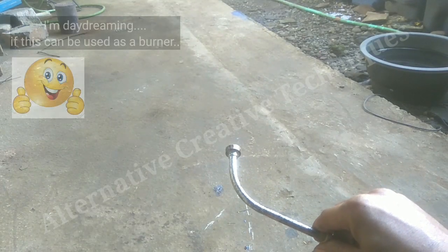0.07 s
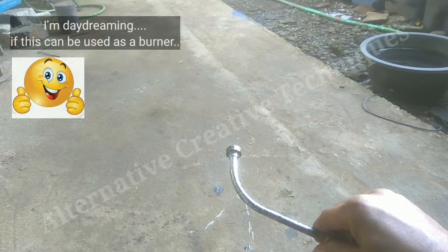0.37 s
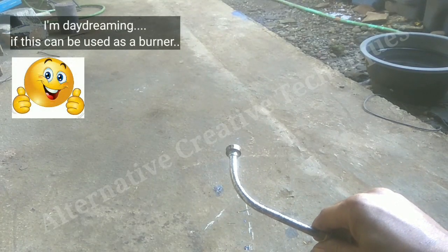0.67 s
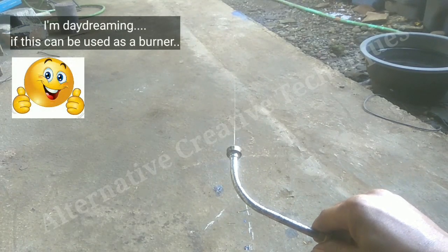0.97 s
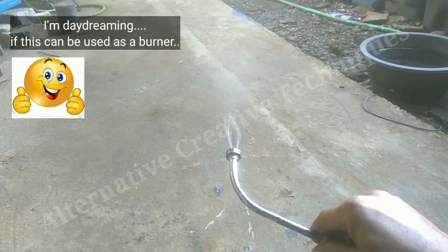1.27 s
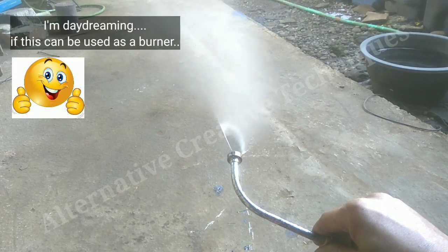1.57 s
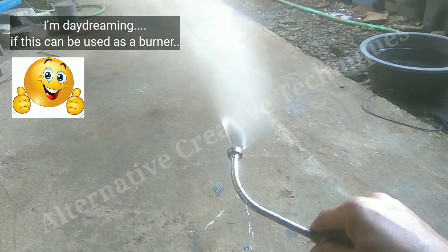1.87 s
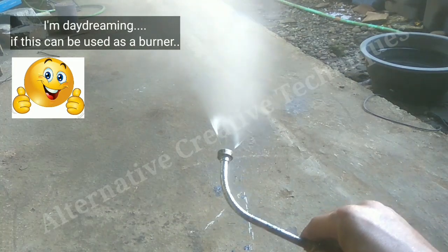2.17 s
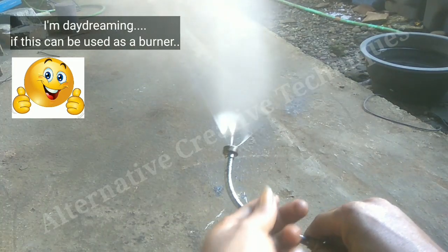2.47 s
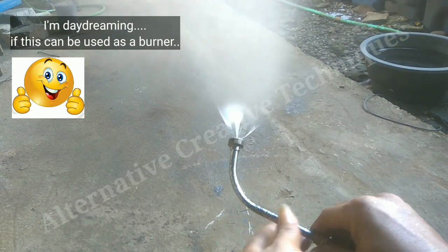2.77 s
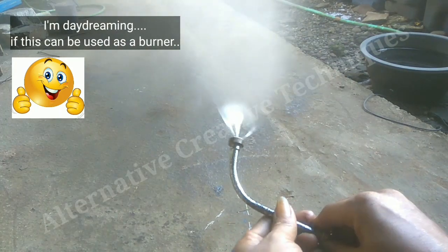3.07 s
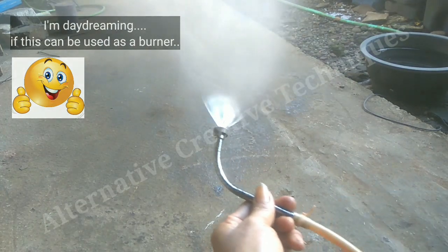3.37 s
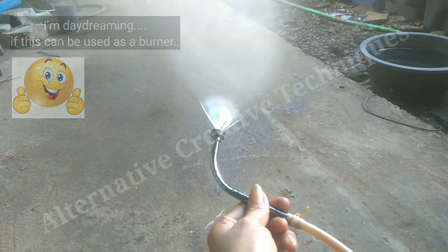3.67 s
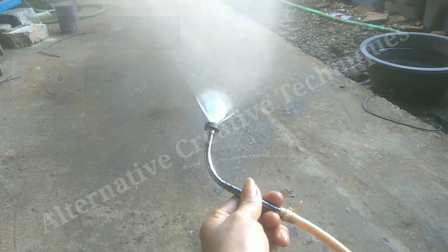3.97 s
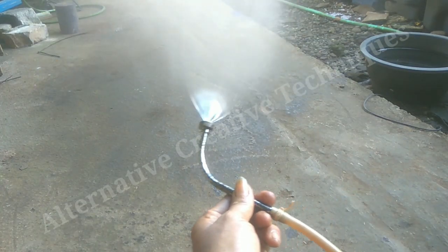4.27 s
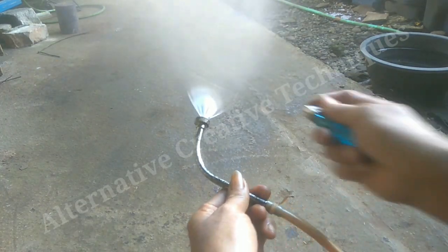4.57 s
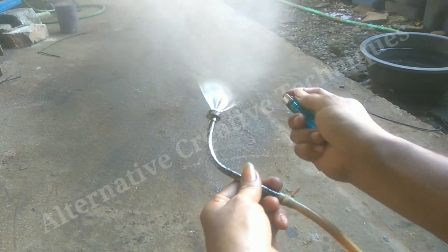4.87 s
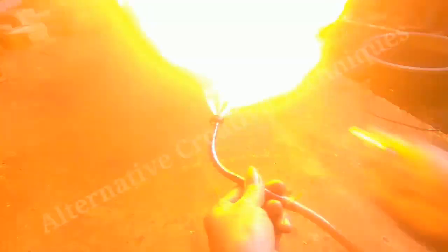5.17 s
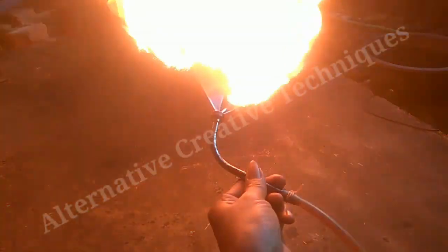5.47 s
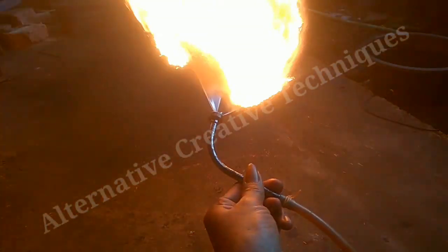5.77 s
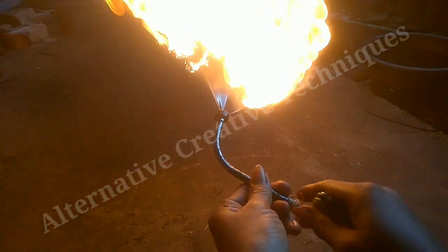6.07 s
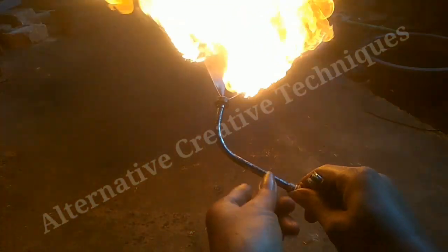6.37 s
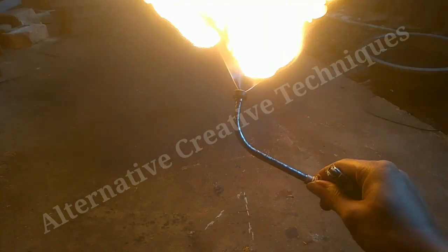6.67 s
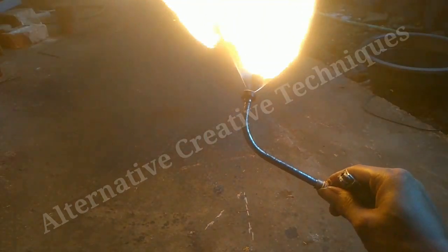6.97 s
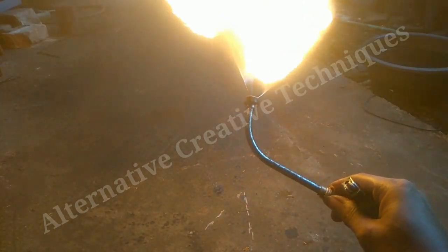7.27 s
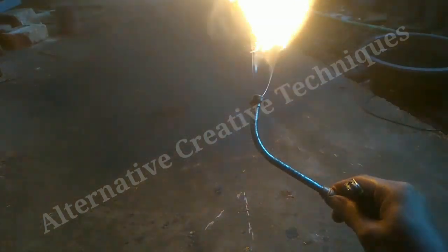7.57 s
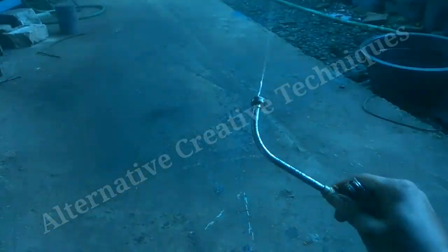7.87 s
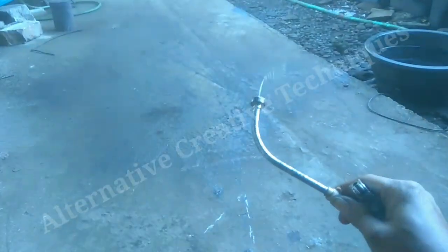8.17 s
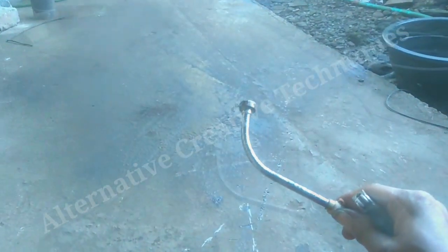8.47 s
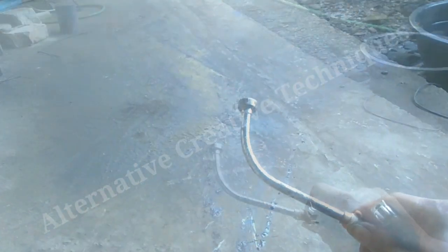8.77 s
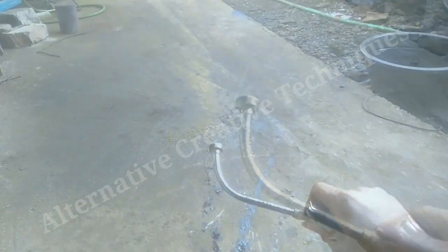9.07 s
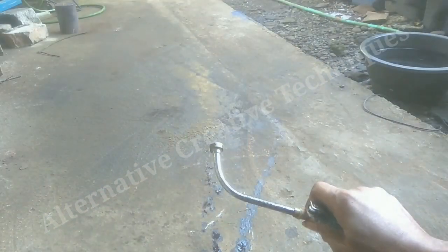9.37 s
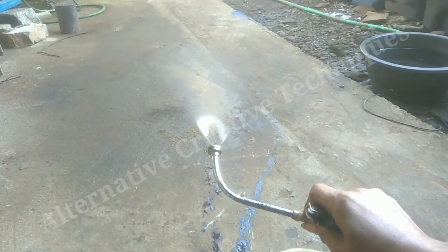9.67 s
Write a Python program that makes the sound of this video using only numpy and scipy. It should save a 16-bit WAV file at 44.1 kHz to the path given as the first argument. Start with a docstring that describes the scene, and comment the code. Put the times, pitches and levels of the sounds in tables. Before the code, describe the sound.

A hissing spray is lit with a lighter, whumps into a roaring flame and goes out, leaving shrill insects in the yard.

```python
"""Insects shrill around a concrete yard, over a faint far engine and open air.
A hand-held nozzle spits, pops clear and sprays a hissing fuel mist. A lighter sets it off:
pockets of mist thump, eddies shake the roar and sizzle, and the flame dies at fuel shut-off.
A far rooster and a small bird call faintly. At the end the spray starts again."""
import sys
import numpy as np
from scipy import signal
from scipy.fft import rfft, irfft, next_fast_len
from scipy.io import wavfile
from scipy.ndimage import uniform_filter1d

SR = 44100
rng = np.random.default_rng(int(sys.argv[2]) if len(sys.argv) > 2 else 0)


def bounce(signal):
    """Save signal as a 16-bit WAV file at the path given by the first command-line argument."""
    frames = np.transpose(np.atleast_2d(signal))
    limited = np.clip(frames, -1, 1)
    pcm = np.round(limited * 32767).astype(np.int16)
    wavfile.write(sys.argv[1], SR, pcm)


N = 437031
T = np.arange(N) / SR

# insect chorus level, fading out near the end: t/s, level/dB, pulse depth of the nearest singer/0-1
INSECT_LEVEL = [(0, -52.5, .3), (3.5, -52, .45), (4.2, -56.5, .6), (5, -51.5, .85), (5.6, -55, .5),
                (6.4, -54.5, .5), (7.85, -50, .4), (8.7, -61, .6), (9.2, -63, .5), (9.6, -88, .4)]
# far chorus: f/Hz, level/dB
CHORUS_SPECTRUM = [(2000, -80), (4250, -50), (4410, -26), (4520, -17), (4590, -6), (4665, -1), (4710, -7),
                   (4755, -18), (5100, -34), (5450, -23), (5570, -18), (5700, -31), (5900, -46),
                   (9000, -80)]
# singers joining in: start/s, end/s, fade/s, f/Hz, level/dB
TRILL_NOTES = [(-.5, 1.5, .5, 4592, -56), (1.4, 4.9, .6, 4590, -64), (8.58, 8.655, 0.012, 4625, -53.5)]
# insects buzzing higher up: start/s, end/s, fade/s, f/Hz, glide/(Hz/s), level/dB
BUZZ_NOTES = [(-.5, 2.4, .6, 6680, -50, -64), (3.5, 8.65, 0.62, 6735, 22, -62),
              (7.6, 8.94, .5, 5580, -0.5, -71), (9, 11, 0.86, 7110, 169, -60.5),
              (-2, 5.7, 1.8, 7525, -6, -61), (2.5, 12.4, 4, 7465, 5, -63.5)]
# tiny insects at the very top: f/Hz, level/dB
SHIMMER_SPECTRUM = [(6000, -50), (9200, -14), (10300, 3), (11200, -2), (12300, -20)]
# far engine speeding up and easing off: t/s, firing rate/Hz, level/dB
ENGINE_RUN = [(0, 32, -56), (.42, 31.7, -57), (.7, 30.5, -59.5), (1.15, 31.4, -57.5), (2, 35.23, -63),
              (3.1, 38.77, -61), (4, 42.4, -62), (4.7, 37.5, -67), (8.6, 35.2, -63.5), (9.5, 35.56, -79)]
# exhaust resonances: f/Hz, half width/Hz, weight/dB
EXHAUST_MODES = [(123, 10.5, 1), (160, 10.5, -0.5), (186.7, 11.4, 1.5), (225, 13, -3)]
# engine machinery: f/Hz, level/dB
WHIR_SPECTRUM = [(150, -26), (400, 7), (500, -23), (620, 7), (760, -55), (880, 10.5), (1050, -19),
                 (1250, 6.5), (1600, -43), (5000, -66)]
# open-air background: t/s, level/dB
AIR_LEVEL = [(0, -59), (7.5, -57.5), (8.3, -59), (9, -64), (9.35, -62), (9.9, -59.5)]
# open-air background: f/Hz, level/dB
AIR_SPECTRUM = [(20, -27), (45, 0), (80, 0.5), (140, -7.5), (250, -8), (340, -15.5), (420, -12.5),
                (640, -12), (850, -19.5), (1600, -25), (4700, -26.5), (5800, -16.5), (10400, -22),
                (12300, -37)]
# mid-range background rising near the end: f/Hz, level/dB
LATE_MID_SPECTRUM = [(150, -28), (330, -16), (420, 0), (660, 0), (850, -9), (1600, -22), (5000, -35)]
# nozzle spits: t/s, level/dB, decay/s, body f/Hz, body/dB, fizz/dB
NOZZLE_SPITS = [(1.076, -57, 0.021, 1060, -1, -14), (1.083, -43, 0.0025, 1070, -16, 0.5),
                (1.369, -51, 0.022, 1030, -7, -7), (1.396, -41, .002, 1100, -14, 1),
                (1.404, -44, .014, 980, -7, -2), (1.44, -54, 0.027, 1050, -9, -1),
                (2.612, -48, .008, 1700, 0, -2), (3.532, -47, 0.013, 1550, 0, -9),
                (3.776, -46, .012, 1555, 1, -9), (3.8, -47, .008, 1600, 0, -9),
                (3.889, -46, .005, 1500, 2, -6), (6.425, -39, .03, 1600, -2, -2),
                (7.598, -39.5, 0.026, 1400, -4, 0.5), (7.645, -44, 0.0083, 1402, -10, -3),
                (9.811, -56, 0.0052, 1199, -4, 0), (9.83, -55, .01, 1990, -7, 4),
                (9.842, -50, .006, 2000, -4, 0.5)]
# fizz of spits and sparks: f/Hz, level/dB
FIZZ_SPECTRUM = [(500, -25), (1800, -7), (3000, -3.5), (4200, -1.5), (6500, 6), (9000, 4), (10800, -2),
                 (12300, -34)]
# echoes off nearby things: delay/s, level/dB
REFLECTIONS = [(.0065, -24), (.0077, -25), (.0101, -20), (.0178, -17)]
# valve openings: t/s, build-up/s, level/dB
VALVE_OPENINGS = [(1.56, 0.1, -46), (9.815, 0.08, -46.5)]
# hiss of the mist: f/Hz, level/dB
MIST_SPECTRUM = [(40, -25), (150, -12), (300, -8), (540, -9), (680, 0), (880, -2), (1080, -3.5), (1400, -7),
                 (1720, -9.5), (2000, -6.5), (2500, -8.5), (4000, -11), (5100, -11), (6600, -5.5),
                 (10300, -12), (12300, -34.5)]
# shifting resonant peaks in the spray's hiss: t/s, low f/Hz, middle f/Hz, high f/Hz
HISS_PEAK_TRACKS = [(1.7, 900, 1200, 2870), (2.2, 879, 1230, 2890), (2.6, 860, 1330, 2880),
                    (3.3, 859.6, 1350, 2880), (3.7, 860, 1500, 2830), (4.7, 899.5, 1450, 2760),
                    (5.05, 1002, 1500, 2740)]
# hiss peaks, low to high: width/Hz, level re hiss/dB
HISS_PEAK_SHAPES = [(190, -9.5), (320, -12), (300, -15.5)]
# fuel pressure swells: t/s, half width/s, gain/dB
PRESSURE_SWELLS = [(3.28, 0.13, 1), (4.25, .2, 0.5)]
# lighter strikes: t/s, level/dB, decay/s, body f/Hz, body/dB, fizz/dB
LIGHTER_STRIKES = [(4.339, -43.5, .008, 1500, 3, -11), (4.759, -38.5, 0.0076, 1352, -3, -2.5),
                   (4.776, -42, .008, 1395, -7, -4), (5.114, -38.5, 0.0069, 6540, -5, -6),
                   (5.12, -34.5, 0.014, 6540, -5.5, -7)]
# rumble of the fireball: f/Hz, level/dB
RUMBLE_SPECTRUM = [(20, -23), (40, -16), (62, -10), (80, 5), (96, -5), (110, 3.5), (135, 0.5), (160, 0),
                   (195, -6), (240, -10), (300, -13.5), (360, -26.5), (600, -38), (2000, -80)]
# rumble heaving and sinking: t/s, half width/s, gain/dB
RUMBLE_HEAVES = [(5.27, .06, 1), (5.59, 0.049, -5.5), (6.17, .11, 2), (6.87, 0.11, 2.5), (7.01, 0.048, -4)]
# vigour of burning (surge, lull, second surge): t/s, gain/dB
BURN_VIGOUR = [(5.2, 1), (5.27, 0.3), (5.34, 5), (5.44, 5.5), (5.53, 2), (5.8, -0.8), (5.93, -1.8),
               (6.28, -1.8), (6.33, 1), (6.45, 2.5), (6.8, 0.2), (7.15, 0.5), (7.6, -1)]
# flame billows and lulls: t/s, half width/s, gain/dB
FLAME_BILLOWS = [(5.72, 0.027, 1.5), (6.53, .025, 0), (6.68, .03, 0.9), (7.0, 0.027, -1), (7.32, .025, 1.5),
                 (7.38, .02, -1), (7.475, .025, -1), (7.555, 0.04, 2.5)]
# brighter early roar: f/Hz, level/dB
EARLY_ROAR_SPECTRUM = [(150, 3), (225, 7), (300, 1.5), (350, -7), (395, 2.5), (440, -5.5), (487, 0.5),
                       (532, -7), (620, 0), (950, 2.5), (1080, -2), (1175, -9), (1530, -5.5), (1900, -12.5),
                       (3000, -20.5), (8000, -38)]
# darker later roar: f/Hz, level/dB
LATE_ROAR_SPECTRUM = [(150, -8), (265, -4), (320, -0.5), (355, -4.5), (397, 3.5), (435, -5.5), (560, 1),
                      (670, 3), (860, -1), (1020, -9), (1180, -7), (1430, -6.5), (1900, -14), (3000, -21),
                      (8000, -54)]
# sizzle of the flame: f/Hz, level/dB
SIZZLE_SPECTRUM = [(700, -27), (1700, -4), (2700, 1), (3800, -3.5), (5000, -1.5), (6300, 2.5), (7600, -2),
                   (9000, -5), (10300, -6), (12300, -28.5)]
# large mist pockets flaring: t/s, peak/dB
POCKET_FLARES = [(5.253, -14), (5.312, -17), (5.672, -18.5), (5.917, -9.5), (6.684, -11.5), (6.732, -16),
                 (6.806, -15)]
# rooster syllables: start/s, end/s, f/Hz, glide/(Hz/s), levels of harmonics 2, 3, 4/dB
CROW_SYLLABLES = [(8.21, 8.35, 648, 400, -82, -74, -78), (8.33, 8.45, 706, -60, -72, -81, -83),
                  (8.768, 8.98, 677, -70, -81, -79.5, -77)]
# small bird's chips: t/s, level/dB
BIRD_CHIPS = [(8.305, -65), (8.382, -55), (8.441, -63)]

IGNITE_S, SHUTOFF_S = 5.155, 7.618


def undb(db):
    """Decibels to gain."""
    return 10 ** (np.asarray(db) / 20)


def unit(x):
    """Scale to rms 1."""
    return x / np.sqrt(np.mean(x ** 2))


def curves(rows):
    """Each column of a timed table, per sample."""
    times_s, *columns = np.transpose(rows)
    return [np.interp(T, times_s, column) for column in columns]


def colour(x, spectrum):
    """Filter by a (f/Hz, level/dB) spectrum; rms 1."""
    size = next_fast_len(N)
    hz, db = np.transpose(spectrum)
    bins_hz = np.maximum(np.fft.rfftfreq(size, 1 / SR), 1)
    gain = undb(np.interp(np.log(bins_hz), np.log(hz), db))
    return unit(irfft(rfft(x, size) * gain, size)[:N])


def noise():
    """White noise."""
    return rng.standard_normal(N)


def walk(rate_hz):
    """Smooth random drift; rms 1."""
    drift = np.interp(T * rate_hz, np.arange(N), noise())
    return unit(uniform_filter1d(drift, max(1, int(SR / rate_hz / 2))))


def grains(rate_hz, spread_db):
    """Random impulses of uneven size; rms 1."""
    impulses = (rng.random(N) < rate_hz / SR) * np.sign(noise())
    return unit(impulses * undb(spread_db * np.clip(noise(), -2, 2)))


def phase_of(hz):
    """Phase/rad of a moving frequency."""
    return 2 * np.pi * np.cumsum(hz) / SR


def since(t_s):
    """Seconds since t_s; zero before."""
    return np.maximum(T - t_s, 0)


def build_up(start_s, rise_s):
    """Gain rising from 0, settling at 1."""
    return 1 - np.exp(-since(start_s) / rise_s)


def hold(start_s, end_s, fade_s):
    """Gain: fade in, hold, fade out."""
    return np.clip(np.minimum(T - start_s, end_s - T) / fade_s, 0, 1)


def swell(centre_s, half_width_s):
    """Bell-shaped gain."""
    return np.exp(-((T - centre_s) / half_width_s) ** 2)


def swells_db(rows):
    """Sum of brief rises and dips."""
    return sum(db * swell(t_s, half_width_s) for t_s, half_width_s, db in rows)


def singer(hz, waver_hz=8):
    """One insect's nearly pure, unsteady note."""
    return unit(np.sin(phase_of(hz + waver_hz * walk(24)))) * undb(0.4 * walk(25))


def buzzer(hz, stroke_hz=38, join_s=0.0087):
    """Each wing stroke restarts a high note at random phase; the joins stutter."""
    stroke = np.floor(stroke_hz * T + .4 * walk(20)).astype(int)
    offset = 2 * np.pi * rng.random(N)[stroke]
    along, across = uniform_filter1d([np.cos(offset), np.sin(offset)], int(join_s * SR))
    phase = phase_of(hz + 10 * walk(120))
    note = along * np.sin(phase) + across * np.cos(phase)
    return unit(note * undb(1.7 * walk(110)))


def insects(stroke_hz=36.3, chorus_db=-2, nearest_db=-1):
    """A far chorus blurs into a narrow band; near singers beat against it, others buzz above."""
    level_db, depth = curves(INSECT_LEVEL)
    wing_pulse = unit(1 + depth * np.sin(phase_of(stroke_hz + 0.59 * walk(12))))
    chorus = undb(chorus_db) * colour(noise(), CHORUS_SPECTRUM)
    nearest = undb(nearest_db) * wing_pulse * singer(hz=4676)
    out = (chorus + nearest) * undb(level_db)
    for start_s, end_s, fade_s, hz, db in TRILL_NOTES:
        out += singer(hz) * hold(start_s, end_s, fade_s) * undb(db)
    for start_s, end_s, fade_s, hz, glide_hz_per_s, db in BUZZ_NOTES:
        out += buzzer(hz + glide_hz_per_s * since(start_s)) * hold(start_s, end_s, fade_s) * undb(db)
    return out


def shimmer(re_air_db=-13, flutter_db=2.6):
    """Tiny insects: fluttering noise in the top treble."""
    air_db, = curves(AIR_LEVEL)
    return colour(noise(), SHIMMER_SPECTRUM) * undb(air_db + re_air_db + flutter_db * walk(200))


def engine(jitter=.002, scatter_db=1, whir_db=-14.5, drone_db=-59.5):
    """Firing harmonics swell as they pass exhaust resonances, over a machinery whir."""
    firing_hz, level_db = curves(ENGINE_RUN)
    phase = phase_of(firing_hz * (1 + jitter * walk(15)))
    exhaust, power = np.zeros((2, N))
    for k in range(2, 9):
        weight = sum(undb(db) * np.exp(-((k * firing_hz - hz) / half_width_hz) ** 2)
                     for hz, half_width_hz, db in EXHAUST_MODES)
        exhaust += weight * np.cos(k * phase)
        power += weight ** 2 / 2
    whir = undb(whir_db) * colour(noise(), WHIR_SPECTRUM)
    boom = exhaust / np.sqrt(power) * undb(scatter_db * walk(25))
    drone = unit(np.cos(2 * phase)) * swell(centre_s=2.24, half_width_s=0.215) * undb(drone_db)
    return (boom + whir) * undb(level_db) + drone


def open_air(late_mid_db=-68):
    """Gently swelling background; near the end it grows fuller in the mids."""
    air_db, = curves(AIR_LEVEL)
    late_mid = colour(noise(), LATE_MID_SPECTRUM) * build_up(start_s=9.05, rise_s=.15) * undb(late_mid_db)
    return colour(noise(), AIR_SPECTRUM) * undb(air_db + .5 * walk(2.4)) + late_mid


def puffs(rows, rise_s, q):
    """Nozzle spits or lighter sparks: bright fizz over a resonance and its weaker octave."""
    out = np.zeros(N)
    white = noise()
    fizz = colour(white, FIZZ_SPECTRUM)
    for t_s, db, decay_s, body_hz, body_db, fizz_db in rows:
        span = slice(int(t_s * SR), int(t_s * SR) + SR // 2)
        age_s = T[span] - T[span][0]
        low, octave = (signal.lfilter(*signal.iirpeak(hz, q, fs=SR), white[span])
                       for hz in (body_hz, 2 * body_hz))
        puff = undb(body_db) * unit(low + .25 * octave) + undb(fizz_db) * fizz[span]
        envelope = (1 - np.exp(-age_s / rise_s)) * np.exp(-age_s / decay_s)
        out[span] += undb(db) * envelope / envelope.max() * puff
    return out


def echoes(x):
    """Early reflections ripple the spectrum."""
    reflected = sum(undb(db) * np.interp(T - delay_s, T, x, left=0) for delay_s, db in REFLECTIONS)
    return (x + reflected) / np.sqrt(1 + sum(undb(db) ** 2 for _, db in REFLECTIONS))


def hiss_peak(hz, width_hz):
    """Noise band around a moving centre; rms 1."""
    skirt = [(k * width_hz, db) for k, db in [(.25, 0), (.5, -3), (1, -14), (4, -60), (8, -100)]]
    phase = phase_of(hz)
    return colour(noise(), skirt) * np.cos(phase) + colour(noise(), skirt) * np.sin(phase)


def spray(sag_db_per_s=.05, release_db_per_s=58):
    """The jet hisses and tears into droplets; resonant peaks shift in the hiss."""
    flow = np.zeros(N)
    for t_s, rise_s, db in VALVE_OPENINGS:
        closing_db = release_db_per_s * since(SHUTOFF_S) * (t_s < SHUTOFF_S)
        flow += build_up(t_s, rise_s) * undb(db - sag_db_per_s * since(t_s) - closing_db)
    jet = colour(noise() + 0.5 * grains(rate_hz=1100, spread_db=3), MIST_SPECTRUM)
    for hz, (width_hz, db) in zip(curves(HISS_PEAK_TRACKS), HISS_PEAK_SHAPES):
        jet += undb(db) * hiss_peak(hz, width_hz)
    return jet * flow * undb(swells_db(PRESSURE_SWELLS) + .5 * walk(9) + 0.85 * walk(90))


def nozzle_pop(t_s=1.568, hz=1040, decay_s=0.0073, db=-45):
    """The nozzle clears with a round, damped ring."""
    age_s = since(t_s)
    return undb(db) * np.exp(-age_s / decay_s) * np.sin(2 * np.pi * hz * age_s)


def burning(catch_s, release_db_per_s):
    """Gain: catches at ignition, holds while fuel flows, dies after shut-off."""
    return build_up(IGNITE_S, catch_s) * undb(-release_db_per_s * since(SHUTOFF_S))


def fireball(base_db=-24, whump_db=4, whump_s=0.14, starve_db=-3.5, starve_s=0.49):
    """Mist pockets ignite and expand; their low thumps merge into a rumble."""
    whump = np.exp(-since(IGNITE_S) / whump_s)  # mist already in the air burns off first
    starve = np.minimum(since(SHUTOFF_S - starve_s) / starve_s, 1)  # shrinks just before shut-off
    level_db = base_db + whump_db * whump + starve_db * starve
    heave_db = swells_db(RUMBLE_HEAVES) + 0.66 * walk(22)
    rumble = colour(grains(rate_hz=2600, spread_db=3), RUMBLE_SPECTRUM)
    return rumble * burning(catch_s=.035, release_db_per_s=70) * undb(level_db + heave_db)


def flame(roar_db=-33.5, sizzle_db=-40.5, darken_start_s=5.75, darken_s=0.72):
    """Eddies shake roar and sizzle together; a brighter early roar crossfades into a darker one."""
    vigour_db = curves(BURN_VIGOUR)[0] + swells_db(FLAME_BILLOWS)
    eddies = walk(70)
    late_share = np.minimum(since(darken_start_s) / darken_s, 1)
    early, late = (colour(noise() + 0.5 * grains(rate_hz=900, spread_db=7.5), spectrum)
                   for spectrum in (EARLY_ROAR_SPECTRUM, LATE_ROAR_SPECTRUM))
    roar = np.sqrt(1 - late_share) * early + np.sqrt(late_share) * late
    sizzle = colour(noise() + 0.47 * grains(rate_hz=900, spread_db=4), SIZZLE_SPECTRUM)
    roar *= undb(roar_db + vigour_db + 0.93 * eddies + .5 * walk(14))
    sizzle *= undb(sizzle_db + 0.49 * vigour_db + .5 * eddies + .5 * walk(110))
    return (roar + sizzle) * burning(catch_s=0.016, release_db_per_s=64)


def flares(hz=115, half_width_s=0.0047):
    """The largest mist pockets flare as single thumps."""
    return sum(undb(peak_db) * swell(t_s, half_width_s) * np.cos(2 * np.pi * hz * (T - t_s))
               for t_s, peak_db in POCKET_FLARES)


def far_off(x, t60_s, wet):
    """Walls and trees scatter a distant call into a short blur."""
    age_s = T[:SR // 2]
    tail = rng.standard_normal(len(age_s)) * undb(-60 * age_s / t60_s)
    scattered = signal.fftconvolve(x, tail / np.linalg.norm(tail))[:N]
    return (x + wet * scattered) / np.hypot(1, wet)


def rooster(jitter=0.016, rasp_db=4.5):
    """Hoarse far crow: three gliding harmonics, rough in pitch and level."""
    crow = np.zeros(N)
    for start_s, end_s, hz, glide_hz_per_s, *levels_db in CROW_SYLLABLES:
        pitch_hz = hz + glide_hz_per_s * np.clip(T - start_s, 0, end_s - start_s)
        phase = phase_of(pitch_hz * (1 + jitter * walk(270)))
        call = sum(undb(db + rasp_db * walk(40)) * np.sin(k * phase) for k, db in enumerate(levels_db, 2))
        crow += np.sqrt(2) * call * hold(start_s, end_s, fade_s=.04)
    return far_off(crow, t60_s=0.35, wet=0.84)


def small_bird(centre_hz=3100, sweep_hz=350, half_width_s=0.003):
    """Three quick chips, each falling in pitch."""
    chips = np.zeros(N)
    for t_s, db in BIRD_CHIPS:
        pitch_hz = centre_hz - sweep_hz * np.tanh((T - t_s) / half_width_s)
        chips += undb(db) * swell(t_s, half_width_s) * np.sin(phase_of(pitch_hz))
    return far_off(chips, t60_s=0.11, wet=0.69)


def scene():
    """Burner in front, yard and creatures behind."""
    spits = puffs(NOZZLE_SPITS, rise_s=.0007, q=10)
    lighter = puffs(LIGHTER_STRIKES, rise_s=0.005, q=3.55)
    burner = echoes(spits + spray() + nozzle_pop() + lighter + flame()) + fireball() + flares()
    yard = insects() + shimmer() + engine() + open_air() + rooster() + small_bird()
    return (burner + yard)[None]


def record(dry, low_hz=37, top_hz=11900):
    """Mono phone microphone: loses the deepest bass and the top."""
    low_cut = signal.butter(7, low_hz, "high", fs=SR, output="sos")
    top_cut = signal.ellip(10, .2, 80, top_hz, fs=SR, output="sos")
    return signal.sosfilt(top_cut, signal.sosfilt(low_cut, dry))


dry = scene()
out = record(dry)
bounce(out)
```